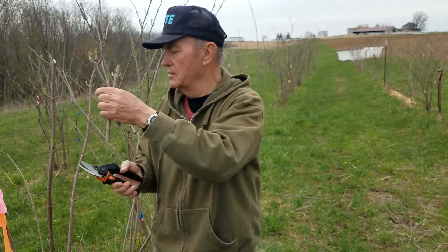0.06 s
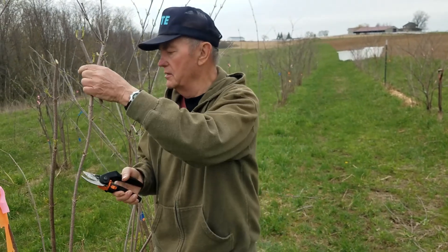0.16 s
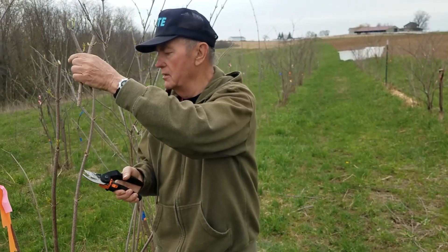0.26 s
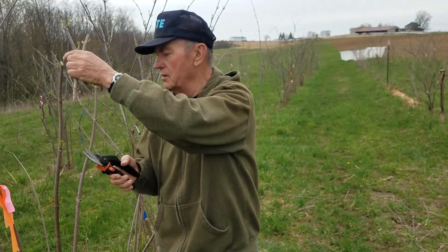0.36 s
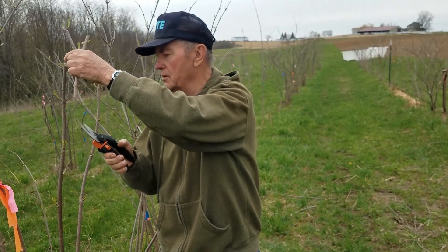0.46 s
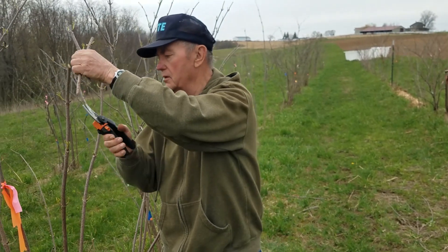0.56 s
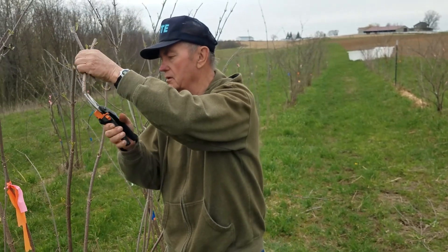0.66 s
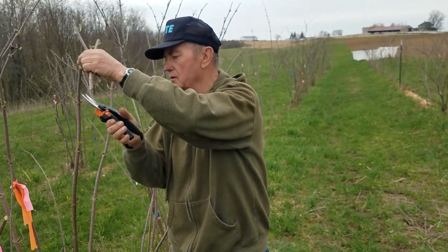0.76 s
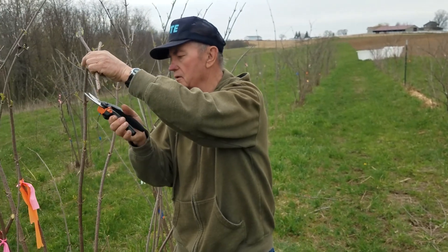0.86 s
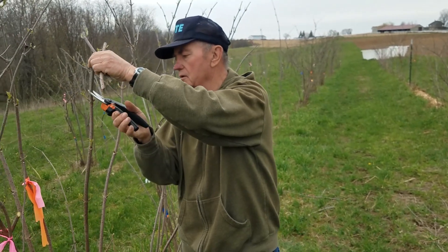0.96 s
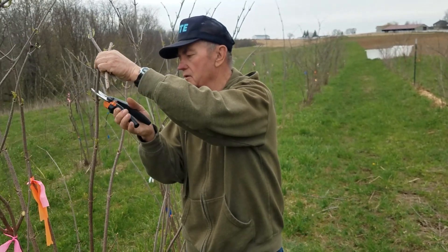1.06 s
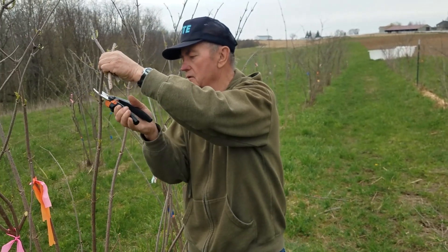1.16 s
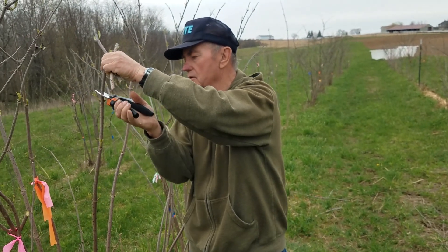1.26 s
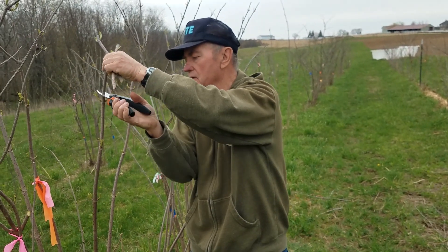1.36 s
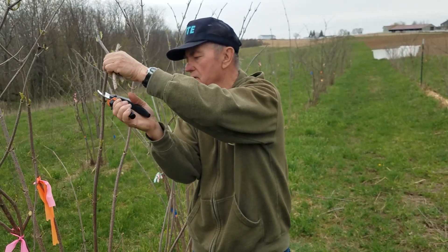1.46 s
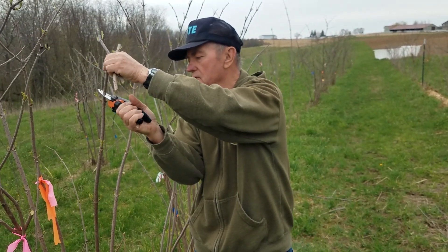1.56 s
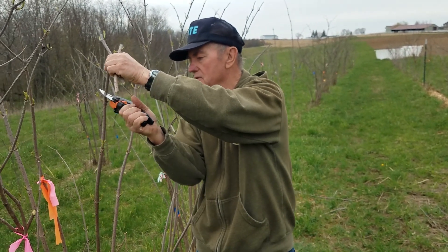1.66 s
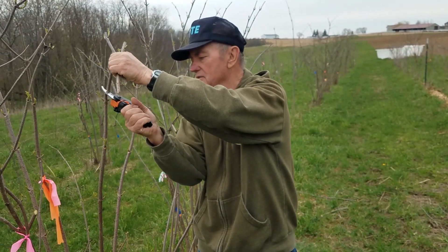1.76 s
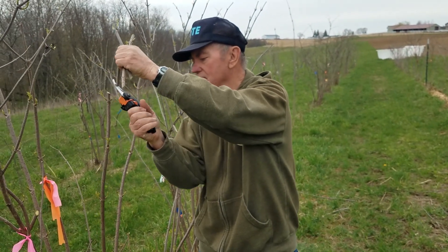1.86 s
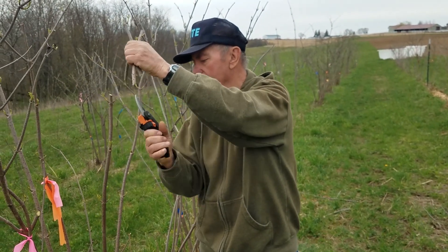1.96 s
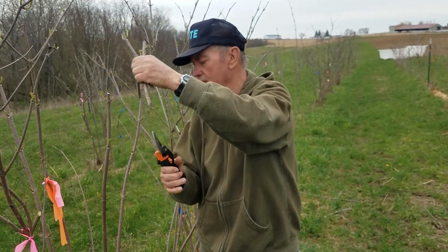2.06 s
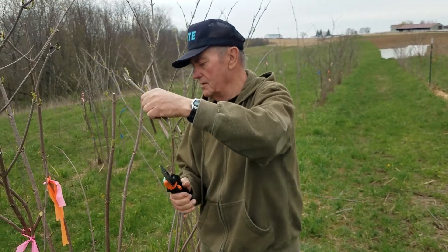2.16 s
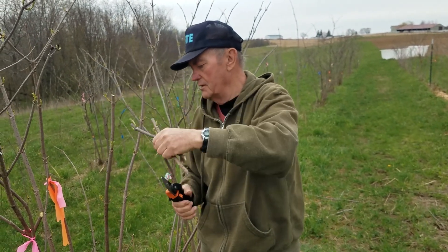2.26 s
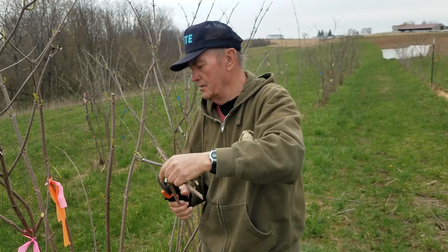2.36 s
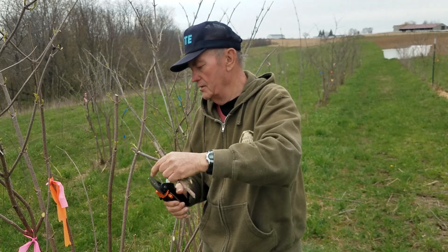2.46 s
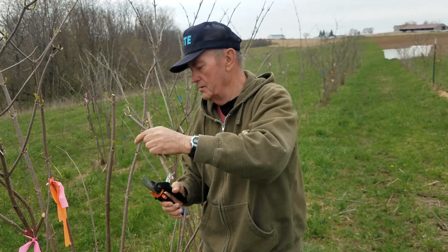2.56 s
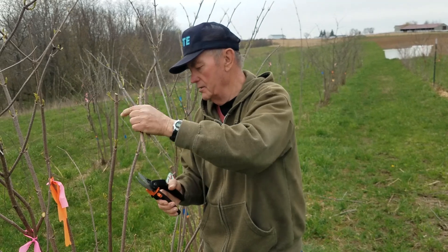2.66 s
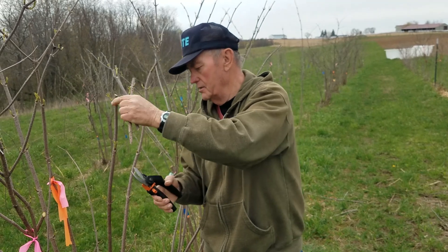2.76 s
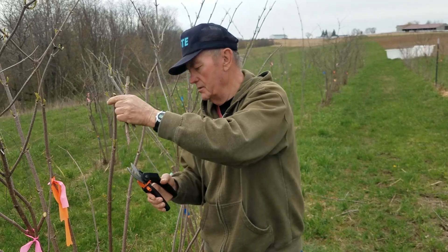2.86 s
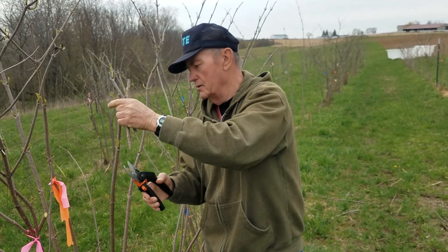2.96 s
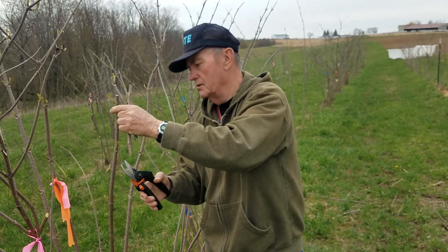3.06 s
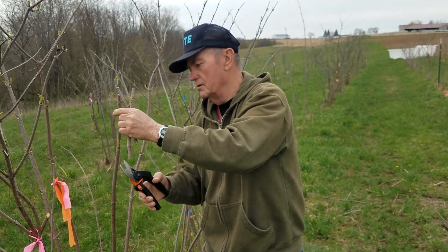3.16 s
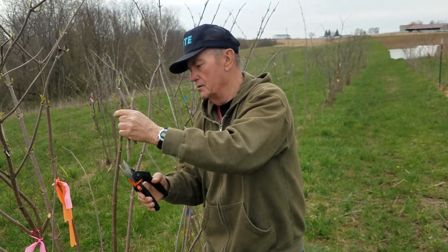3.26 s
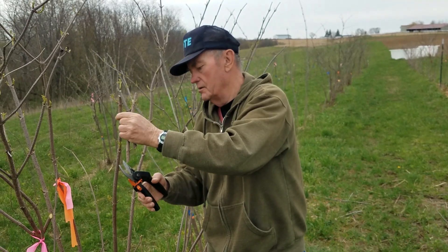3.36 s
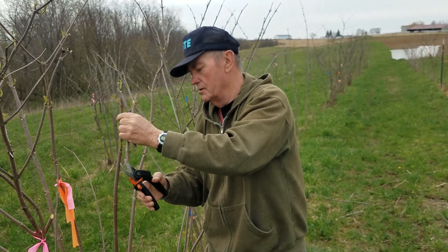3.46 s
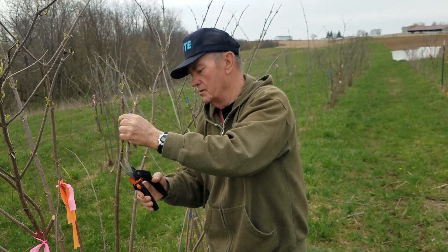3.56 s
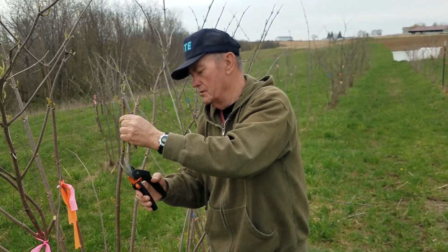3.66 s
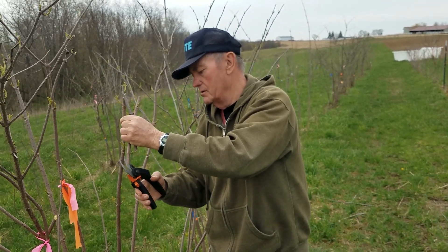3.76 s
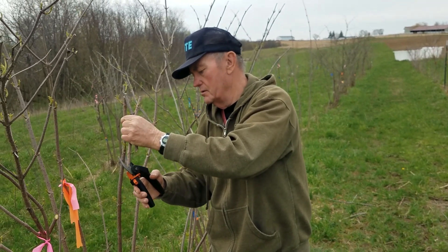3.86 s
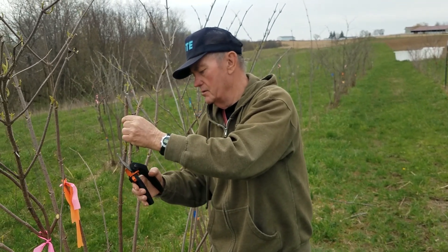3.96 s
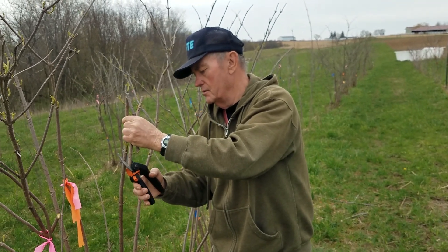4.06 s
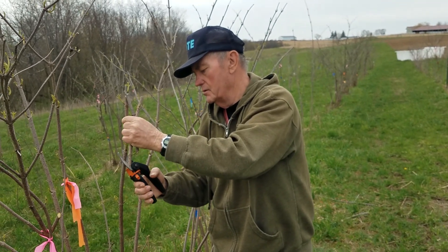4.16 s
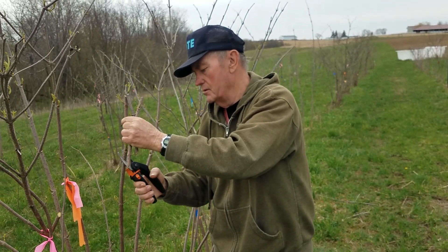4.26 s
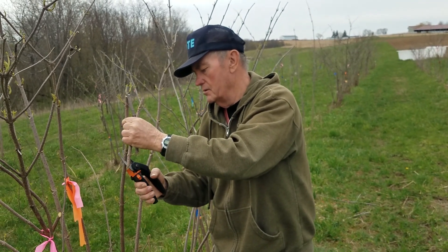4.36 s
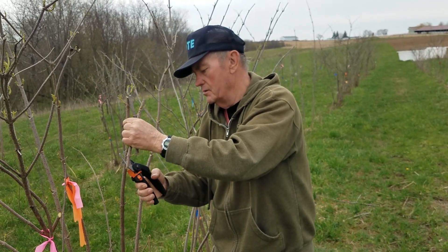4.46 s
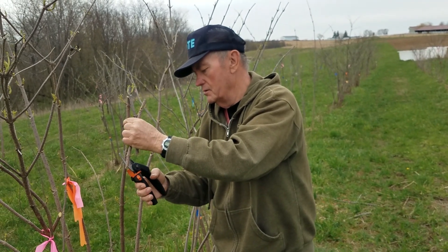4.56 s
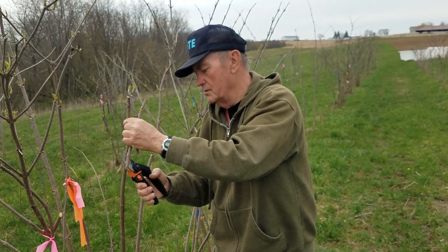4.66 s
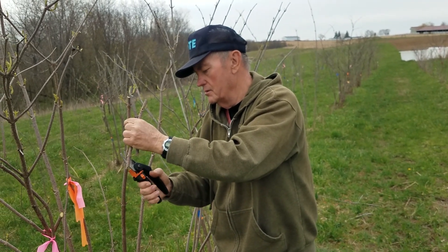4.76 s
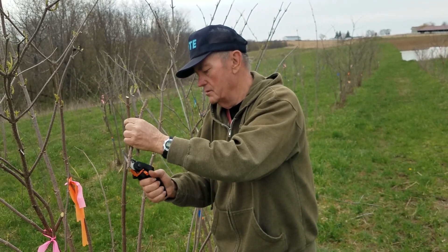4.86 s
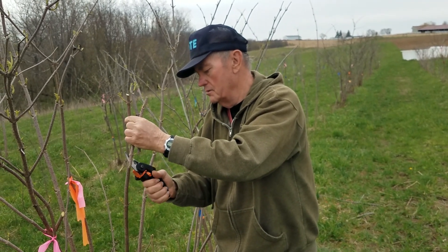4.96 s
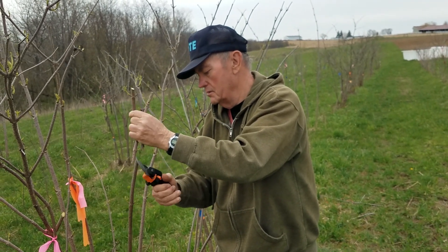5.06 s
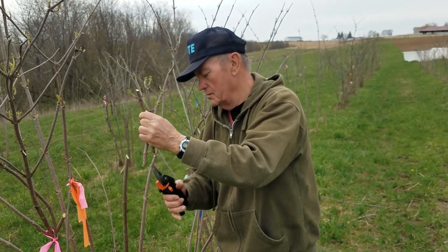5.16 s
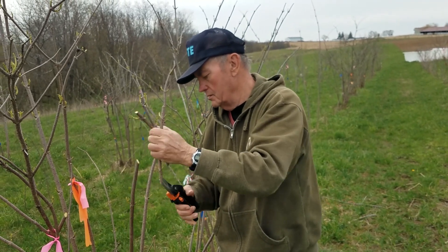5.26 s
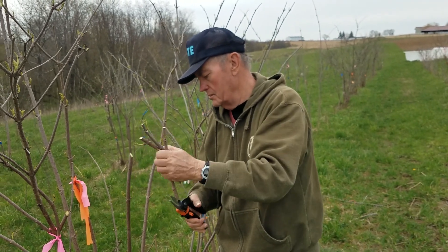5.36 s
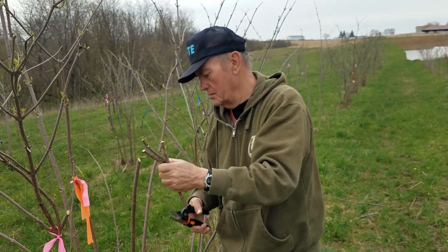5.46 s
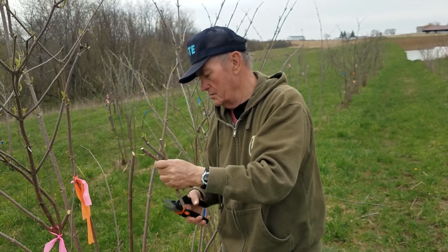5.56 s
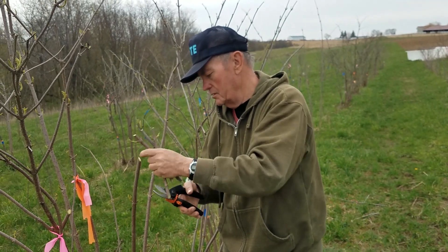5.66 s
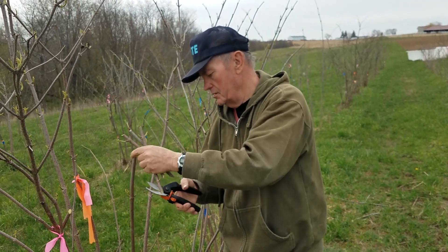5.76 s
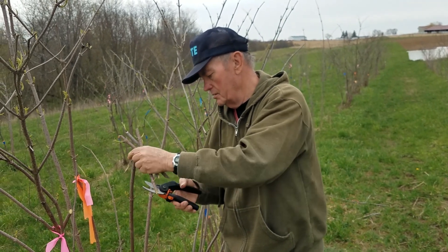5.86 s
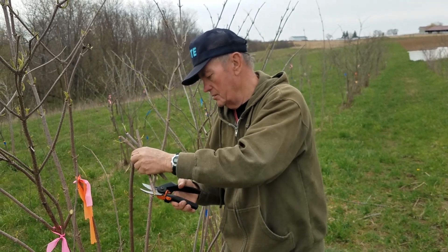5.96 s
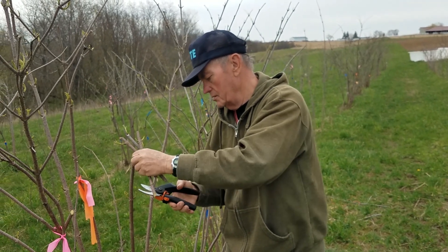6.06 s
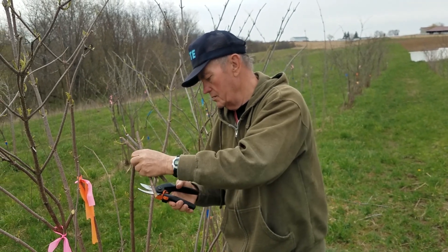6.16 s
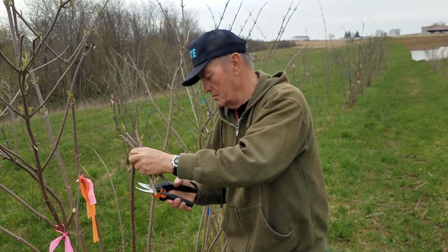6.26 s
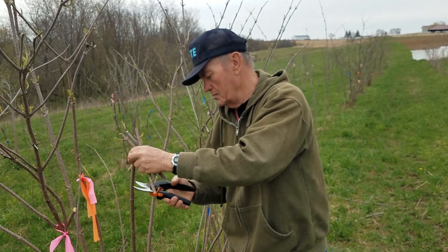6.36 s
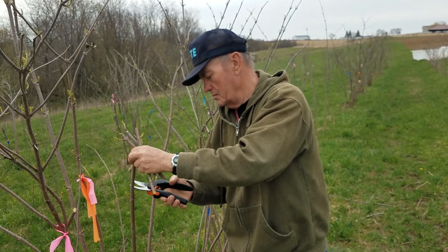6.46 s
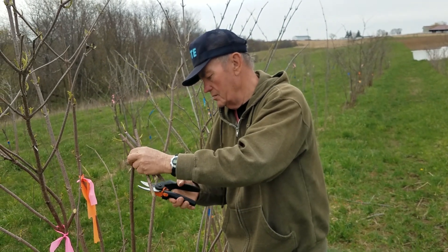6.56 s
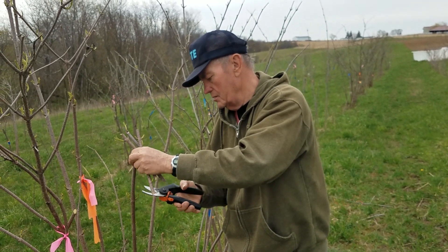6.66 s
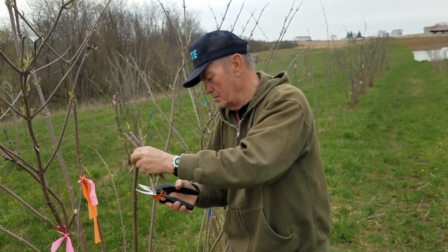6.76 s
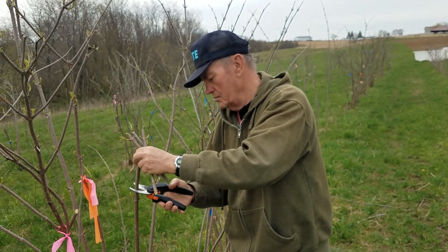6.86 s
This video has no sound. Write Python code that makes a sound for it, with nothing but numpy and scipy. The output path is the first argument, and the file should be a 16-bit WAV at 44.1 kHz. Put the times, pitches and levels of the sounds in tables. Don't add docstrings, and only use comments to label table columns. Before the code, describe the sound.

Two pruning cuts in an open orchard, recorded close with handheld stereo. Sleeve cloth brushes softly, steel touches wood with small clicks, and the first stem gives way in a very sharp woody snap. Distant birds whistle, rising and level, over a low traffic wash and a steady hum. Then dense fibre crunching leads to a second snap with a dull handle clack, followed by a few light ticks and a clear descending bird whistle.

```python
import sys
import numpy as np
from scipy import signal
from scipy.fft import rfft, irfft, next_fast_len
from scipy.io import wavfile
from scipy.ndimage import uniform_filter1d

SR = 44100
rng = np.random.default_rng(int(sys.argv[2]) if len(sys.argv) > 2 else 0)


def to_linear_factor(level_db):
    exponent = np.asarray(level_db, float) / 20
    return 10 ** exponent


def inscribe(sig):
    pcm = np.round(np.clip(np.atleast_2d(sig).T, -1, 1) * 32767)
    wavfile.write(sys.argv[1], SR, pcm.astype(np.int16))


N = 305678

# (time [s], level [dB])
TRAFFIC_LEVEL = [(0, -58), (.62, -62), (1.06, -59.5), (2.0, -59.5), (2.59, -63), (2.9, -59.5), (3.9, -62.5),
                 (4.46, -59), (5.5, -61.5), (6.2, -61), (6.93, -62)]
# (time [s], level [dB])
MOTOR_LOAD = [(0, -59.5), (.5, -61.5), (1.06, -62.5), (1.58, -64.5), (2.2, -59.5), (3.0, -57.5),
              (3.53, -57.5), (3.9, -61.5), (4.46, -62), (4.88, -59), (5.5, -64.5), (5.8, -63.5),
              (6.2, -58.5), (6.93, -62.5)]
# (time [s], level [dB])
HUM_LEVEL = [(0, -59.5), (.13, -57.5), (2.0, -62.5), (2.1, -58), (2.49, -64), (2.74, -63.5), (3.34, -65),
             (3.57, -62), (3.71, -72), (4.09, -70), (4.69, -66), (4.8, -59.5), (4.9, -64.5), (6.48, -58.5),
             (6.93, -56.5)]
# (frequency [Hz], level per Hz [dB])
TRAFFIC_COLOUR = [(100, -11), (200, -9.5), (280, -9), (400, -0.5), (560, -5.5), (800, -7.5), (1100, -6),
                  (1500, -39.5)]
WASH_COLOUR = [(700, -7), (1200, 3.5), (2000, 1.5), (3000, -3), (4500, -25), (6000, -36)]
HISS_COLOUR = [(2500, -34), (3500, 0.5), (4500, -0.5), (6500, -5), (10000, -7), (12000, -3), (14000, 2),
               (17500, 2.5)]
# (frequency [Hz], likeness [-1 to 1])
LIKENESS = [(60, 0.27), (130, -0.0021), (290, 0.301), (640, 0.28), (1410, 0.16), (3100, 0.1), (6820, 0.3),
            (15000, 0.25)]
# (frequency [Hz], left over right [dB])
LEAN = [(60, 4.5), (110, 4.5), (200, -2), (380, -3), (700, 0), (2380, -1.5), (8120, 0.5), (15000, 1.0)]
# (frequency [Hz], width [Hz], level [dB])
DRONE = [(647, 26, -1), (729.5, 18, -0.5), (800, 27, 1), (876, 32, 1.5), (914, 48.6, -0.5), (1001, 126, -6)]
GROWL = [(291.3, 28, 8.5), (371.5, 40, 0.5)]
# (peak time [s], rise [ms], fall [ms], level [dB])
LEAVES = [
    (.12, 260, 260, -63),
    (3.19, 580, 260, -70.5),
]
# (peak time [s], rise [ms], fall [ms], level [dB])
GUSTS = [
    (1.06, 300, 201, -84),
    (1.8, 503, 800, -71),
]
# (time [s], level [dB], frequency [Hz])
KNOCKS = [
    (2.089, -47.5, 111),
    (2.715, -46, 258),
    (2.769, -53, 240),
]
# (peak time [s], rise [ms], fall [ms], level [dB])
RUSTLES = [
    (.162, 200, 120, -61),
    (.468, 190, 510, -60.5),
    (1.048, 81, 49, -52.5),
    (2.16, 440, 130, -59.5),
    (2.774, 32, 27, -53),
    (2.92, 25, 56, -56),
    (2.955, 30, 36, -59),
    (2.99, 30, 40, -64),
]
# (frequency [Hz], lag [ms])
PORT_LAG = [(800, .065), (2000, .088), (3500, .109), (5000, .146), (6500, .125), (12500, .117),
            (15500, .125)]
# (frequency [Hz], right port level [dB])
PORT_SHADE = [(400, 2), (2000, -1.5), (4200, 6), (6500, -2), (8000, -1), (10000, -5), (12500, -0.5),
              (15500, -0.5)]
# (time [s], crack level [dB])
PRICKS = [(.421, -58), (.472, -55), (1.59, -53), (1.598, -54), (1.608, -54), (1.635, -50), (1.652, -52),
          (1.66, -54), (1.7645, -49), (1.7745, -55), (2.759, -59), (2.94, -57), (2.955, -56), (4.8075, -38),
          (4.8125, -38), (4.8185, -39), (4.825, -33), (4.113, -56), (4.835, -44), (4.845, -46)]
# (time [s], ring level [dB], ring frequency [Hz], crack level [dB])
TICKS = [(1.3775, -38, 2400, -42), (1.411, -57, 2300, -50), (1.5115, -49, 2280, -46),
         (1.522, -28, 2450, -42), (1.5364, -56, 2220, -43), (1.558, -35, 2200, -37.5),
         (1.564, -40, 2480, -44), (1.669, -51, 2580, -37), (2.2526, -30, 3080, -39),
         (2.775, -50, 3420, -57), (3.436, -58.5, 2800, -47.5), (4.103, -51, 7600, -54.5),
         (4.107, -50, 6660, -54), (4.147, -53, 2580, -46), (4.1672, -32.5, 2380, -32.5),
         (4.205, -56, 7380, -67), (4.75, -50, 7570, -46), (4.859, -36.5, 7600, -38),
         (4.871, -54, 2230, -37), (4.8915, -46, 2200, -38), (5.053, -47, 4970, -40),
         (5.113, -40.5, 2440, -55), (5.127, -54, 7800, -65.5), (5.828, -43, 7600, -52)]
# (time [s], ring level [dB], ring frequency [Hz], ring time to -60 dB [ms], crack level [dB])
SNAPS = [(1.5304, -19.5, 2270, 8, -28), (1.7028, -17.5, 2400, 25, -15), (1.7055, -17, 2370, 11, -10),
         (1.7059, -3, 5260, 4.8, -17), (1.7095, -16, 2010, 1.8, -29), (1.7117, -7.5, 1880, 3.9, -35),
         (1.7152, -30, 1580, 25, -27), (1.73, -47, 1880, 6.9, -42), (1.7585, -41, 1210, 16, -44),
         (1.778, -37, 1640, 14, -60), (4.7730, -45, 2420, 5, -21), (4.7863, -24, 14500, 4.6, -33),
         (4.8760, -20, 1860, 10, -22), (4.8771, -12, 2340, 7.1, -23), (4.8787, -9, 1870, 9, -18)]
# (frequency [Hz], level [dB], ring time to -60 dB [s])
STEEL = [(3300, -8.5, .01), (4030, -6, .01), (5050, -12, 0.012), (5576, -6, .01), (7500, -10, 0.006),
         (10960, -5, 0.005), (14960, -5.5, .004)]
# (peak time [s], rise [ms], fall [ms], level [dB], rasp over crunch [dB])
CRUNCHES = [(1.38, 2.2, 25, -52, 5.5), (1.415, 8, 15, -54.5, 6), (1.465, 79, 140, -62.5, 3.5),
            (1.512, 1.5, 75.4, -50.5, 5.5), (1.5367, 3, 5, -45, 5.5), (1.563, 12, 39, -45, -5),
            (1.608, 10, 19, -62, 7), (1.67, 44, 46, -55.5, 3.5), (1.706, 2.5, 8, -16, 0.5),
            (1.72, 8, 18, -59, 14), (1.745, 13, 40, -64, 12), (1.759, 5.6, 15, -60, 6),
            (1.783, 8, 31, -53, -8), (2.776, 20, 14, -54, 5), (4.11, 10, 42, -56.5, 1),
            (4.148, 6, 24, -55, 1), (4.168, 1, 5, -50, 7), (4.172, 4.7, 11, -48.5, 9.5),
            (4.755, 34, 25, -59.5, 8), (4.777, 3, 13.5, -37.5, 5), (4.792, 4, 17, -61, -1),
            (4.811, 4, 21, -36.5, 8), (4.821, 12.5, 17, -35.5, 3), (4.838, 14, 25, -52, -10),
            (4.86, 40, 25, -50, 4), (4.878, 1.7, 13.4, -24, -3), (4.91, 9, 76, -57.5, 2.5),
            (5.827, 13, 14, -53.5, 6)]
# (peak time [s], rise [ms], fall [ms], level [dB])
CREAKS = [(1.533, 54, 40, -51), (1.57, 30, 80, -63), (1.625, 25, 30, -59), (1.69, 46, 11, -51),
          (1.71, 2.7, 35, -30), (1.755, 4, 31, -49), (1.777, 3.6, 73, -41), (4.15, 90, 81, -66),
          (4.778, 30, 40, -58), (4.816, 10, 16, -44), (4.868, 50, 9, -62), (4.884, 1.5, 19, -29),
          (4.91, 9, 90, -52)]
# (peak time [s], rise [ms], fall [ms], level [dB])
SLIDES = [
    (1.381, 4, 25, -62),
    (1.418, 8, 20, -58),
    (1.512, 1, 6, -57),
    (1.525, 4, 19.4, -49.5),
    (4.815, 10, 20, -38.5),
    (4.845, 20, 20, -58),
    (4.862, 15, 8, -48),
    (5.828, 6, 10, -55),
]
# (frequency [Hz], width [Hz], level [dB])
PITH = [(617, 110, 0.5), (990, 1100, 9)]
STEM = [(1420, 1600, -4), (1880, 1150, 2.5), (2418, 645, 1.6), (3800, 2630, -2.5)]
BLADE = [(5500, 1390, -1.5), (7600, 1800, -8), (10330, 980, -3.5), (14500, 7400, 1)]
EDGE = [(7550, 456, 0), (8050, 500, -4)]
# (time [s], level [dB], frequency [Hz], free ringing [ms])
RINGS = [(1.5218, -47, 5400, 2), (1.533, -39, 2400, 1.5), (1.53, -26, 4530, 1),
         (1.5304, -27, 13000, 1), (1.5355, -40, 3000, 1.8), (1.551, -39, 2200, 2.7),
         (1.7028, -11, 2410, 8.2), (1.7053, -8.5, 2360, 3.1), (1.7046, -18, 1210, 4.4),
         (1.7116, -17, 3600, 2.6), (1.7112, -19.5, 5200, 2), (1.7165, -31, 5400, 1.5),
         (1.729, -43, 5200, 1.8), (1.707, -19, 2800, 1.6), (1.7053, -25, 10800, .8),
         (1.72, -32, 1200, 5), (1.778, -41, 2100, 3), (1.7792, -37, 1300, 8), (1.782, -46, 840, 6),
         (1.7836, -46, 2354, 5.4), (4.168, -39, 7400, 1), (4.1676, -40, 15700, 1),
         (4.774, -27, 15700, 1), (4.773, -37, 11800, 1), (1.7056, -30, 15100, 1),
         (4.1725, -42, 3520, 2), (4.172, -40, 7500, 1.48), (4.1725, -42, 13200, 2),
         (4.18, -48, 14500, 1), (1.9, -39, 1150, 4), (1.563, -45, 1400, 6),
         (4.773, -22, 1890, 2.4), (4.772, -24.5, 2480, 2), (4.773, -27, 7550, 1.5),
                (4.773, -43, 4060, 1.5), (4.786, -38, 7800, 1.5), (4.8105, -34, 7550, 2),
                (4.8125, -25, 7460, 1.5), (4.8127, -30, 1760, 3), (4.8136, -33, 960, 3.2),
                (4.8175, -26, 7460, 3), (4.8178, -28, 2110, 3.1), (4.819, -32, 920, 4),
                (4.8237, -31, 953, 4.8), (4.825, -33, 1800, 3), (4.8275, -34, 2100, 4),
                (4.836, -42, 2730, 3), (4.8425, -38, 3260, 3), (4.8766, -25, 7830, 2.5),
                (4.8762, -25, 980, 1.3), (4.8761, -25, 5300, 1.3), (4.878, -22, 7700, 1.5),
                (4.878, -13, 2950, 1.3), (4.8789, -27, 5060, 1.2), (4.884, -36, 4960, 2),
                (4.815, -36, 1700, 2), (4.816, -41, 700, 6), (4.826, -41, 720, 6.5),
                (4.773, -33, 6200, 0.89), (4.816, -41, 700, 6), (4.826, -41, 720, 6.5),
                (1.5305, -39, 1180, 4), (1.563, -45, 1100, 6), (4.773, -33, 6200, 0.89)]
# (time [s], level [dB])
CLAPS = [(1.5308, -62), (1.7045, -35), (1.7053, -28), (1.7079, -24), (1.7146, -29), (1.7288, -33.5),
         (1.756, -46), (1.777, -49), (2.2518, -44.5), (2.775, -48), (4.8784, -27.5), (4.8838, -25),
         (4.891, -43)]
# (share of length [0-1], share of pitch glide, level [dB])
GLIDE = [(0, 0, -14), (.15, .13, -5), (.68, .74, 0), (1, 1, -13)]
SWOOP = [(0, 0, -22), (.2, .09, -1), (.5, .33, -1), (.6, .48, -6), (1, 1, -5)]
HOLD = [(0, 0, -2.5), (.15, .15, 0), (.85, .85, -3), (1, 1, -7)]
FADE = [(0, 0, -3), (.15, .05, 0), (.55, .35, -2), (1, 1, -9)]
SAG = [(0, 0, -1), (.1, .1, 0), (.35, .6, 0), (1, 1, -7)]
ARCH = [(0, .3, -1), (.2, 0, 0), (.55, 1, 0), (1, -.1, -3)]
CHIP = [(0, 0, -9), (.25, .05, 0), (.64, .57, -3), (1, 1, -7)]
HOOK = [(0, 0, 0), (.3, .86, 0), (.48, .97, -5), (1, 1, -15)]
FALL = [(0, 0, -14), (.12, .19, -15), (.23, .53, -10), (.285, .67, 0), (.4, .86, -2), (.48, .89, 0),
        (.65, .96, -7), (.75, .98, -3), (1, 1, -5)]
# (time [s], length [s], from [Hz], to [Hz], level [dB])
RISING_HIGH = [
    (1.985, .235, 3230, 3920, -57.5),
]
RISING_LOW = [
    (1.96, .24, 2750, 3600, -59),
]
GLIDES = [
    (4.4, .225, 3340, 3980, -71),
]
HOLDS = [
    (3.445, .175, 2815, 2840, -64.5),
    (3.84, .185, 2815, 2805, -63.5),
    (6.029, .033, 2335, 2325, -53),
    (6.072, .02, 2315, 2305, -52),
]
UPPER_HOLDS = [
    (3.445, .165, 3020, 3190, -65.5),
]
UPPER_SAGS = [
    (3.85, .165, 3240, 3070, -68.5),
]
ARCHES = [
    (4.018, .07, 2530, 2760, -65),
    (5.2, .075, 2540, 2740, -64),
    (5.31, .06, 2560, 2690, -66),
    (5.42, .06, 2450, 2640, -69),
]
FALLS = [
    (5.838, .182, 3620, 2335, -45),
]
HOOKS = [
    (5.615, .105, 3600, 2650, -63),
]
FAINT = [
    (4.51, .07, 2800, 2250, -73),
    (4.69, .035, 2300, 2500, -71),
    (4.24, .17, 5100, 4920, -77),
]
# (time [s], level [dB])
CHIP_RUNS = [
    (4.505, -68),
    (4.96, -68.5),
]


def rms_one(x):
    return x / np.sqrt(np.mean(x ** 2) + 1e-20)


def highpass(x, hz, order=2):
    return signal.sosfilt(signal.butter(order, hz, "high", fs=SR, output="sos"), x)


def two_ports(common, different):
    return common + different * [[1], [-1]]


def in_time(tables, silent=-120.):
    t = np.arange(N) / SR
    out = silent
    for rows in tables:
        s, *columns = np.transpose(rows)
        inside = (t >= s[0]) & (t < s[-1])
        before = out if np.ndim(out) else (0 if out is None else silent)
        out = np.where(inside, [np.interp(t, s, c) for c in columns], before)
    return out


def at_hz(points, hz):
    known_hz, value = np.transpose(points)
    return np.interp(np.log(hz), np.log(known_hz), value)


def drift(rate):
    r = np.exp(-80 * np.pi * rate / SR)
    chance = rng.standard_normal(N // 40 + 2002)
    slow = signal.lfilter([1], [1, -2 * r, r * r], chance)[2000:]
    return np.interp(np.arange(N) / 40, np.arange(len(slow)), rms_one(slow))


def swells(rows):
    out = np.zeros(N)
    for s, rise_ms, fall_ms, db in rows:
        start = max(int((s - rise_ms / 400) * SR), 0)
        end = min(int((s + fall_ms / 400) * SR), N)
        at = np.arange(start, end)
        ms = 1000 * (at / SR - s)
        out[at] += to_linear_factor(db - 20 * np.maximum(-ms / rise_ms, ms / fall_ms))
    return out


def ring(clicks, hz, t60):
    r, w = to_linear_factor(-60 / (t60 * SR)), 2 * np.pi * hz / SR
    return signal.lfilter([0, np.sin(w)], [1, -2 * r * np.cos(w), r * r], clicks + 1e-18)


def body(x, peaks):
    total = 0
    for k, (hz, width, db) in enumerate(peaks):
        total = total + (-1) ** k * to_linear_factor(db) * np.sqrt(width) * ring(x, hz, 2.2 / width)
    return rms_one(total)


def sides(x, pan_db):
    return x * to_linear_factor([[pan_db / 2], [-pan_db / 2]])


def from_left(x, pan_db):
    size = next_fast_len(N)
    hz = np.arange(size // 2 + 1) * SR / size + 1e-3
    shade = to_linear_factor(at_hz(PORT_SHADE, hz))
    lag = np.exp(-2j * np.pi * hz * at_hz(PORT_LAG, hz) / 1000)
    late = irfft(rfft(x[1], size) * shade * lag, size)[:N]
    return sides(np.array([x[0], late]), pan_db)


def banded_noise(spectrum, patchy_db, alike_share):
    low, high = spectrum[0][0], spectrum[-1][0]
    edges = np.geomspace(low, high, int(3 * np.log2(high / low)) + 1)
    white, out = rng.standard_normal((2, 2, N)), 0
    for k, (a, b) in enumerate(zip(edges, edges[1:])):
        band = signal.butter(2, [a, b], "band", fs=SR, output="sos")
        mid, side = signal.sosfilt(band, white[k % 2])
        hz = np.sqrt(a * b)
        alike = np.clip(alike_share * at_hz(LIKENESS, hz), -1, 1)
        gain = to_linear_factor(at_hz(spectrum, hz) + patchy_db * drift(6.3))
        stereo = two_ports(np.sqrt(1 + alike) * mid, np.sqrt(1 - alike) * side)
        out = out + sides(gain * stereo, at_hz(LEAN, hz))
    return rms_one(out)


def traffic(level_db):
    air = rng.standard_normal((2, N))
    growl = to_linear_factor(level_db - 3) * body(two_ports(air[0], .5 * air[1]), GROWL)
    roar = to_linear_factor(level_db + 0.5) * banded_noise(TRAFFIC_COLOUR, patchy_db=0.6, alike_share=1.37)
    return roar + sides(growl, -3.0)


def motor(load_db):
    (hum_db,) = in_time([HUM_LEVEL])
    turn = 2 * np.pi * np.cumsum(83.6 + 0.55 * drift(4.5)) / SR
    hum = np.sqrt(2) * to_linear_factor(hum_db + 1.61 * drift(14.5)) * np.sin([turn, turn - .9])
    air = rng.standard_normal((2, N))
    drone = to_linear_factor(load_db - 2) * body(two_ports(air[0], .5 * air[1]), DRONE)
    return sides(hum, 4.4) + sides(drone, -2.5)


def upper_wash(load_db):
    level = to_linear_factor(-64.5 + 0.15 * (load_db - np.median(load_db))) + swells(LEAVES)
    return to_linear_factor(4.5) * level * banded_noise(WASH_COLOUR, patchy_db=1.8, alike_share=0.59)


def wind():
    band = signal.butter(2, [30, 130], "band", fs=SR, output="sos")
    rumble = rms_one(signal.sosfilt(band, rng.standard_normal((2, N))))
    level = (to_linear_factor(-77) + swells(GUSTS)) * to_linear_factor(9 + 2 * drift(4.56))
    return sides(level * rumble, 1.8)


def microphone_hiss():
    return to_linear_factor(-67.5 + 3.5) * banded_noise(HISS_COLOUR, patchy_db=1, alike_share=0.27)


def dull_knocks():
    out = 0
    for s, db, hz in KNOCKS:
        click = (np.arange(N) == round(s * SR)) * 1.
        out = out + to_linear_factor(db) * ring(click, hz, 0.11)
    return out


def field():
    (traffic_db,), (load_db,) = in_time([TRAFFIC_LEVEL]), in_time([MOTOR_LOAD])
    far = traffic(traffic_db) + motor(load_db) + upper_wash(load_db)
    return far + wind() + microphone_hiss() + dull_knocks()


def rustle():
    noise = rng.standard_normal((2, N)) * to_linear_factor(3.35 * drift(34))
    noise = highpass(two_ports(noise[0], 1.1 * noise[1]), 11000, order=1)
    return uniform_filter1d(swells(RUSTLES), size=400) * rms_one(noise)


def hits(events, steel_db, crack_ms):
    out, t = np.zeros((2, N + 4096)), np.arange(4096) / SR
    click = (t == 0) * 1.
    fade = np.exp(-1000 * t / crack_ms) + 0.05 * np.exp(-t / 0.00269)
    for s, ring_db, hz, t60_ms, crack_db in events:
        chance = rng.standard_normal((3, len(t)))
        wood = ring(click, hz, t60_ms / 1000) - 0.3 * ring(click, 0.63 * hz, 0.005)
        steel = 0
        for (f, level, t60), c in zip(STEEL, chance[2]):
            steel = steel + to_linear_factor(level + 4 * c) * ring(click, f, t60)
        crack = highpass(two_ports(chance[0], .5 * chance[1]) * fade + 4 * click, 2400)
        at = round(s * SR)
        out[:, at:at + len(t)] += to_linear_factor(ring_db) * wood + to_linear_factor(crack_db) * (crack + to_linear_factor(steel_db) * steel)
    return highpass(out[:, :N], 200)


def pricks():
    return hits([(s, -80, 2400, 4, db) for s, db in PRICKS], steel_db=-13.5, crack_ms=.6)


def ticks():
    events = [(s, db, hz, 5.1 + hz / 1000, crack_db) for s, db, hz, crack_db in TICKS]
    return hits(events, steel_db=-14, crack_ms=.5)


def crunch(per_s, spread_db):
    grains = (rng.random((2, N)) < per_s / SR) * rng.choice([-1, 1], (2, N))
    grains = grains * to_linear_factor(spread_db * np.minimum(rng.exponential(1, (2, N)), 4))
    grains = two_ports(grains[0], .5 * grains[1])
    creak = to_linear_factor(-8.5) * swells(CREAKS) * body(grains, PITH)
    woody = swells([row[:4] for row in CRUNCHES]) * body(grains, STEM)
    rasp_rows = [(s, rise, fall, db + tilt) for s, rise, fall, db, tilt in CRUNCHES]
    rasp = swells(rasp_rows) * body(grains, BLADE)
    singing_edge = swells(SLIDES) * body(grains, EDGE)
    return highpass(creak + woody + rasp + singing_edge, 200)


def partials():
    out, ms = np.zeros(N + 2048), 1000 * np.arange(2048) / SR
    for s, db, hz, free_ms in RINGS:
        fade_db = -60 * (ms / 30 + np.maximum(ms - free_ms, 0) / 4)
        onset = 1 - np.exp(-ms / 0.45)
        at = round(s * SR)
        out[at:at + 2048] += to_linear_factor(db + fade_db) * onset * np.sin(2 * np.pi * hz * ms / 1000)
    return highpass(out[:N], 400)


def snaps():
    return hits(SNAPS, steel_db=-17, crack_ms=0.42)


def claps():
    click = np.zeros(N)
    for s, db in CLAPS:
        click[round(s * SR)] = to_linear_factor(db)
    thud = ring(click, 1010, 0.018) + .4 * ring(click, 1220, 0.028)
    thud = thud + 0.22 * ring(click, 485.3, 0.06) + 0.12 * ring(click, 260, 0.077)
    return highpass(thud, 200)


def woods(x):
    t = np.arange(SR) / SR
    near_trunks = 1 + 0.93 * np.exp(-t / 0.089)
    tail = rng.standard_normal((2, SR)) * to_linear_factor(-60 * t) * near_trunks
    tail /= np.sqrt(np.sum(tail ** 2, axis=1, keepdims=True))
    return signal.fftconvolve(x[None], tail, axes=1)[:, :N]


def notes(shape, rows):
    return [[(s + u * length, a + v * (b - a), db + d) for u, v, d in shape] for s, length, a, b, db in rows]


def whistle(tables, flutter_db):
    hz, db = in_time(tables)
    level = uniform_filter1d(to_linear_factor(db + flutter_db * drift(44)), size=300)
    return np.sqrt(2) * level * np.sin(2 * np.pi * np.cumsum(np.abs(hz)) / SR)


def birds():
    rising = whistle(notes(GLIDE, RISING_HIGH), flutter_db=4)
    rising = rising + whistle(notes(SWOOP, RISING_LOW), flutter_db=2.5)
    chips = []
    for (s, db), count in zip(CHIP_RUNS, (3, 4)):
        chips += [(s + k * .091, .028, 5010, 3600, db) for k in range(count)]
    upper = notes(GLIDE, GLIDES) + notes(FADE, UPPER_HOLDS) + notes(SAG, UPPER_SAGS)
    upper += notes(ARCH, ARCHES) + notes(HOOK, HOOKS) + notes(HOLD, FAINT[1:])
    lower = notes(HOLD, HOLDS) + notes(CHIP, chips) + notes(FALL, FALLS)
    others = whistle(upper, flutter_db=3.5) + whistle(notes(HOLD, FAINT[:1]), flutter_db=3.5)
    others = others + whistle(lower, flutter_db=1.2)
    scattered = woods(highpass(to_linear_factor(4.0) * rising + to_linear_factor(.5) * others, 3100, order=4))
    return from_left([rising] * 2, 1.5) + sides(others, -1.5) + scattered


def scene():
    cuts = snaps() + claps() + partials()
    soft = ticks() + crunch(per_s=4500, spread_db=3.2)
    echo = to_linear_factor(-39) * woods(cuts[0] + soft[0])
    steady = field() + rustle() + from_left(pricks(), 0.96) + from_left(soft, 1.0) + echo + birds()
    top = signal.ellip(12, .3, 55, 15780, fs=SR, output="sos")
    return from_left(cuts, 0.964) + signal.sosfilt(top, steady)


def roll_off(x):
    return signal.sosfilt(signal.butter(12, 16610, fs=SR, output="sos"), x)


def record(dry):
    top = signal.cheby2(14, 65, 16700, fs=SR, output="sos")
    mix = signal.sosfilt(top, np.clip(dry, -1, 1)) - .0012
    return roll_off(mix)


dry = scene()
out = record(dry)
inscribe(out)
```